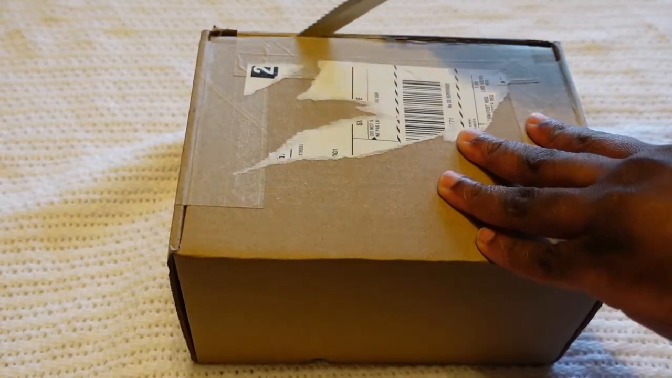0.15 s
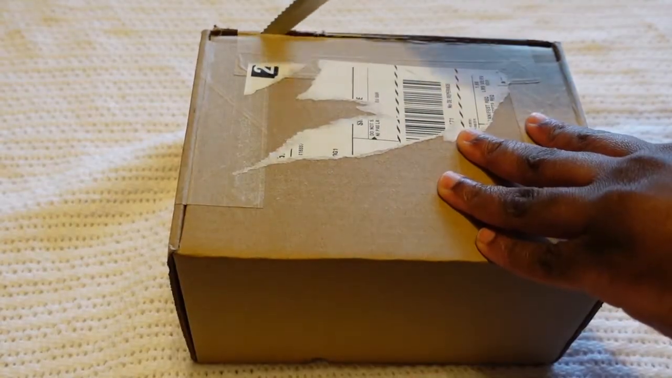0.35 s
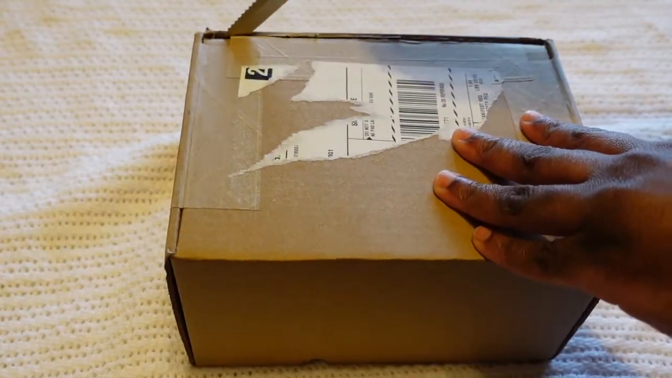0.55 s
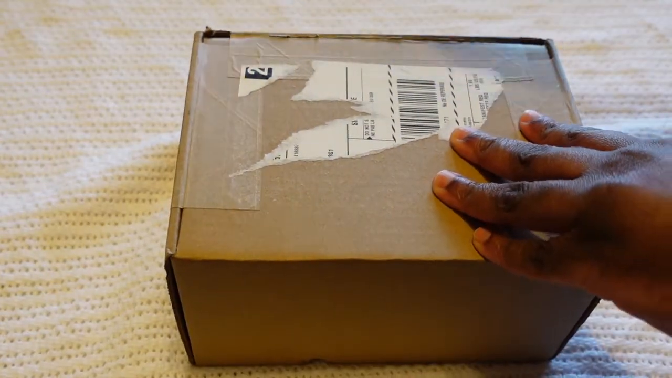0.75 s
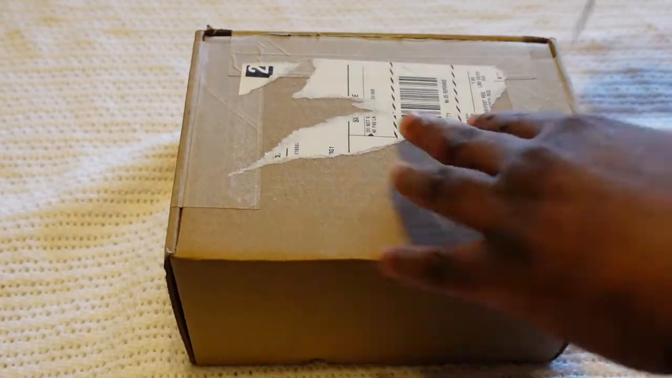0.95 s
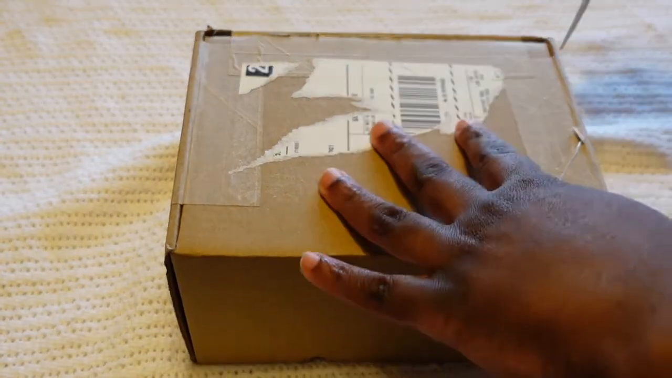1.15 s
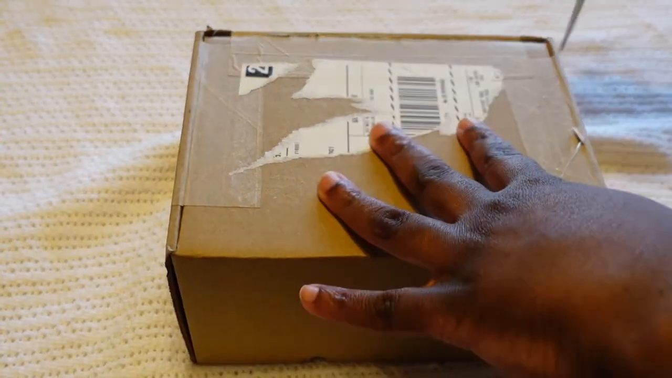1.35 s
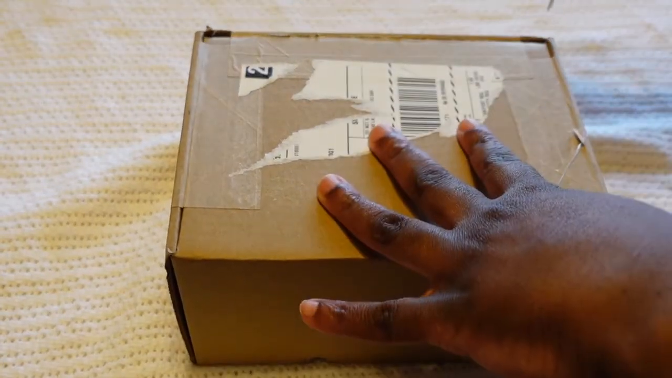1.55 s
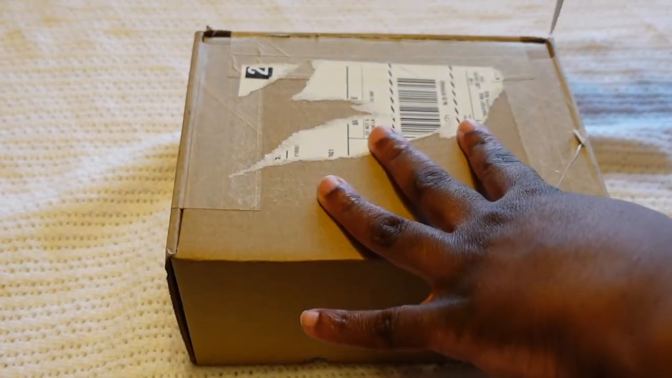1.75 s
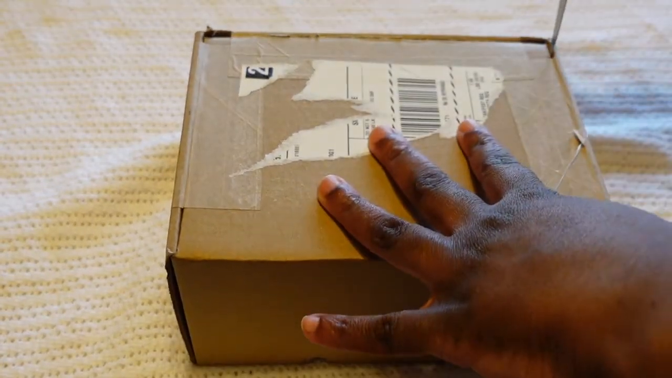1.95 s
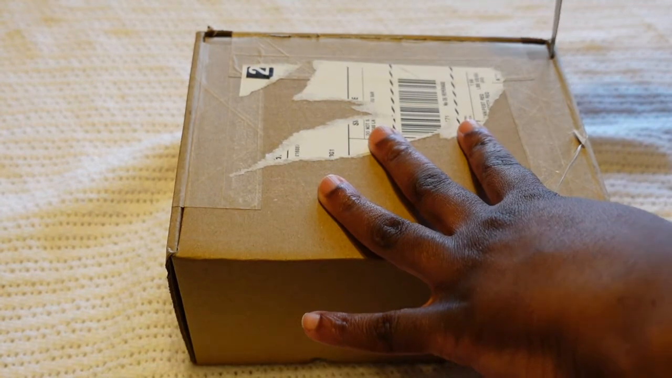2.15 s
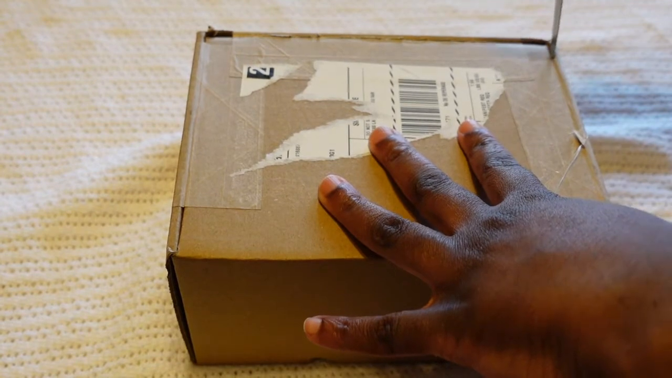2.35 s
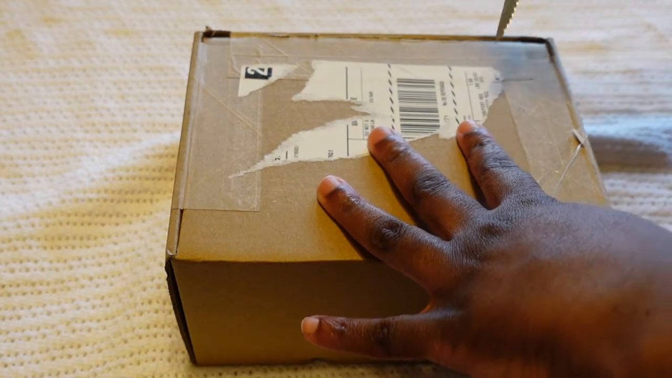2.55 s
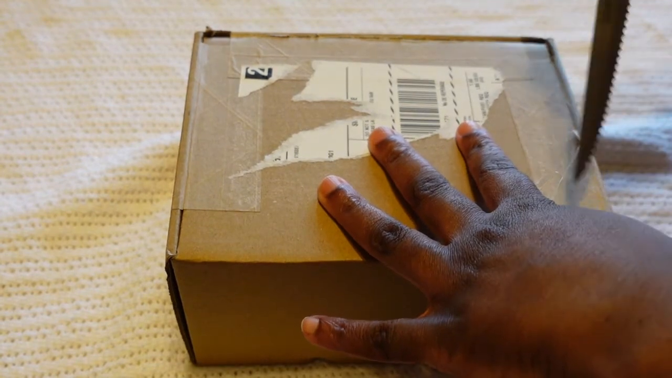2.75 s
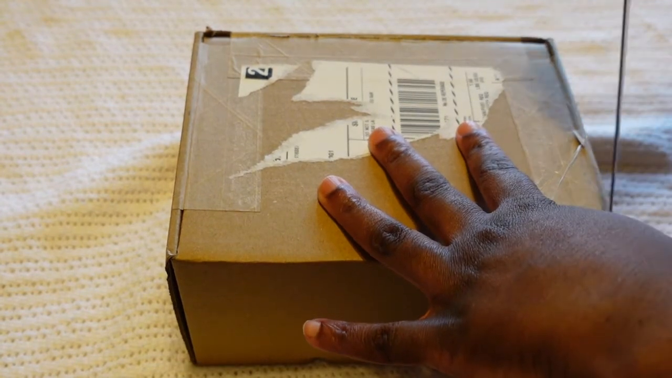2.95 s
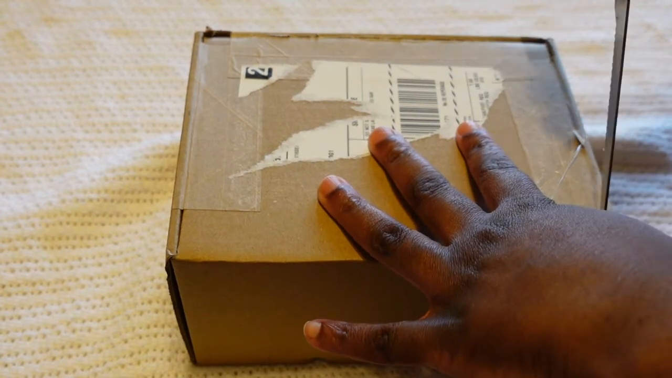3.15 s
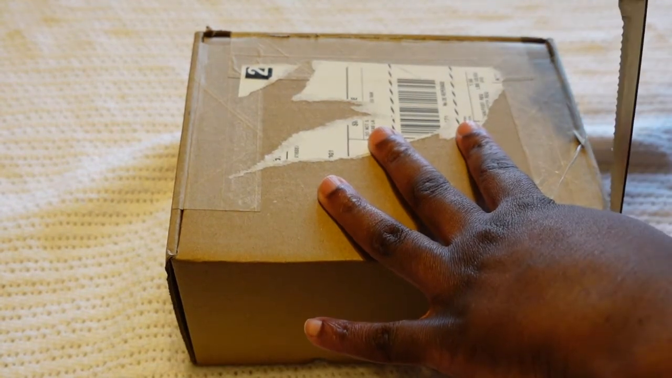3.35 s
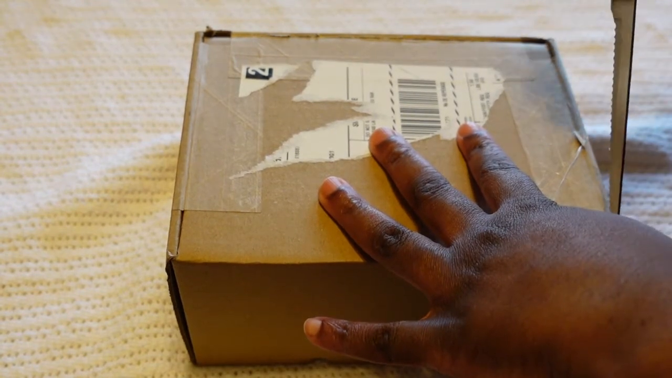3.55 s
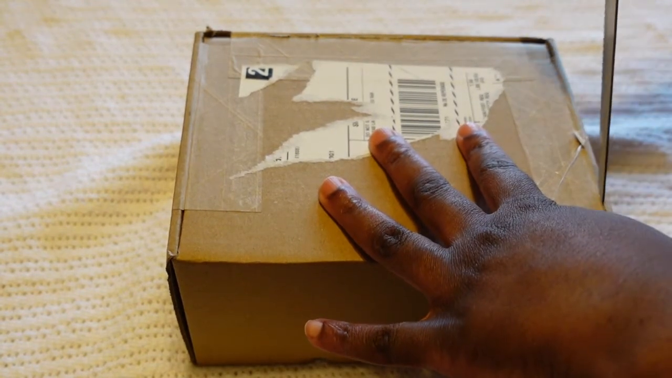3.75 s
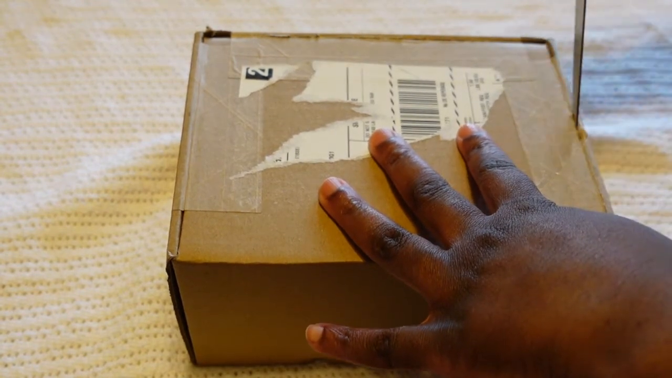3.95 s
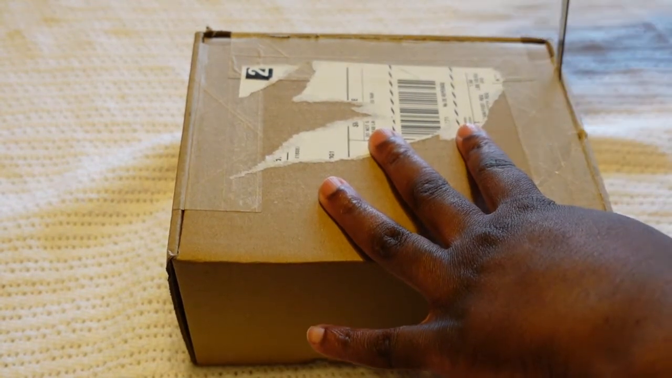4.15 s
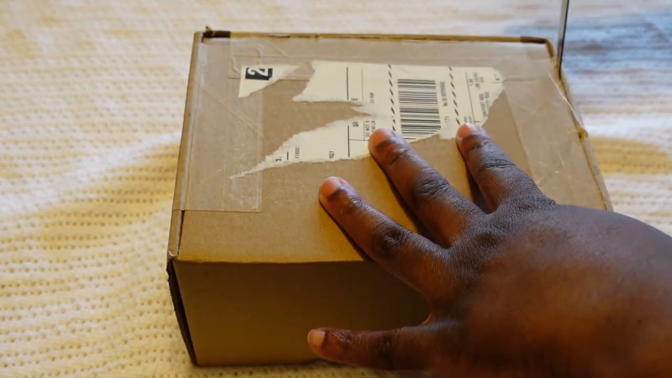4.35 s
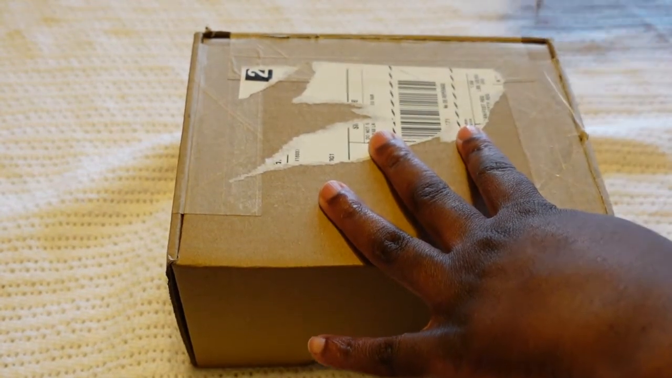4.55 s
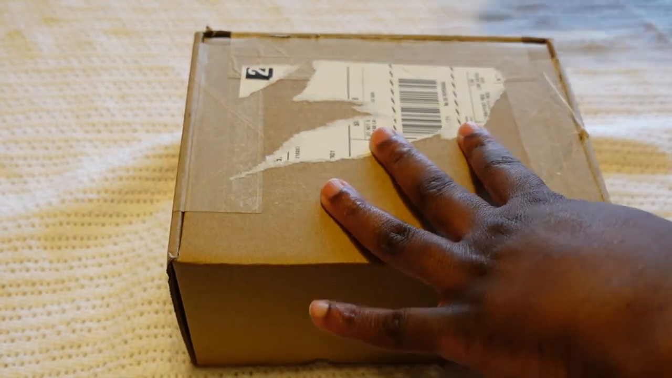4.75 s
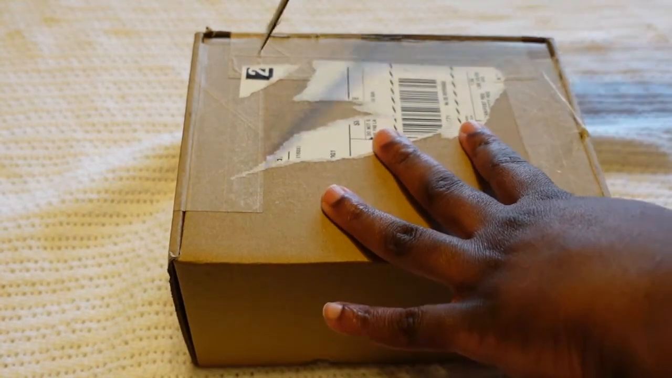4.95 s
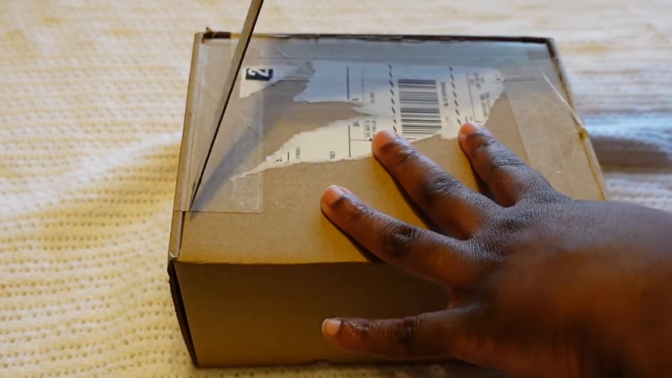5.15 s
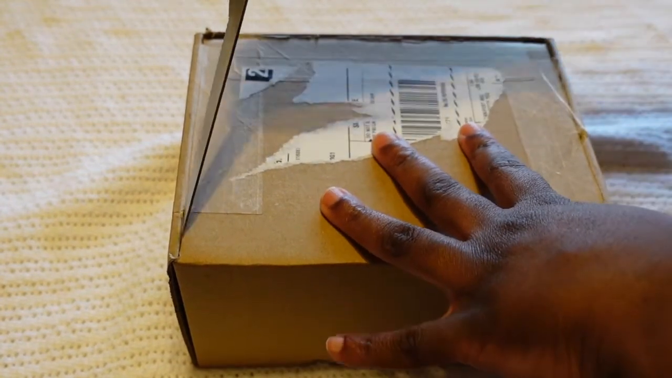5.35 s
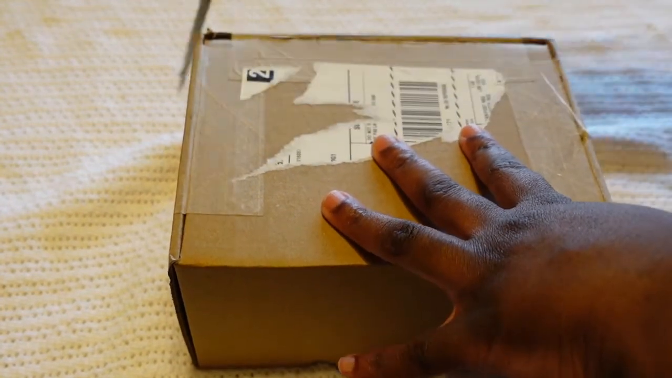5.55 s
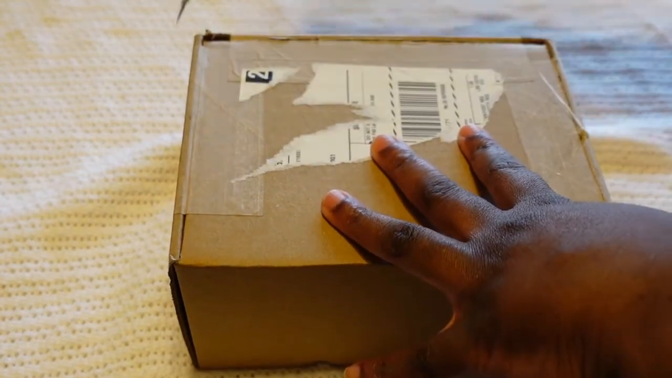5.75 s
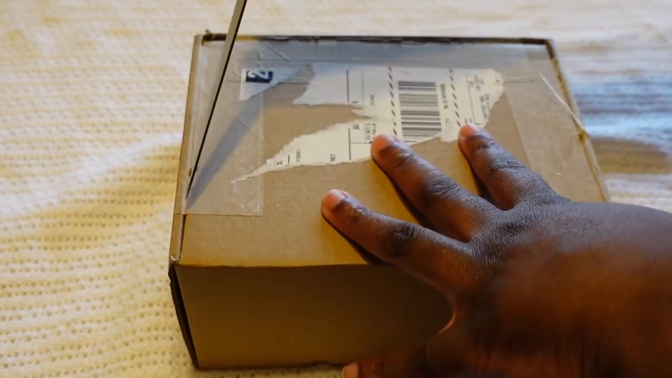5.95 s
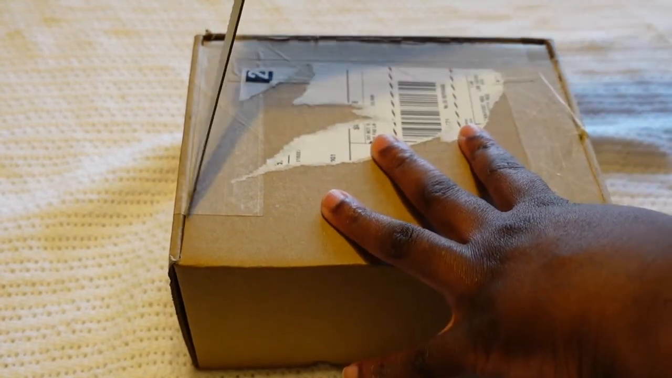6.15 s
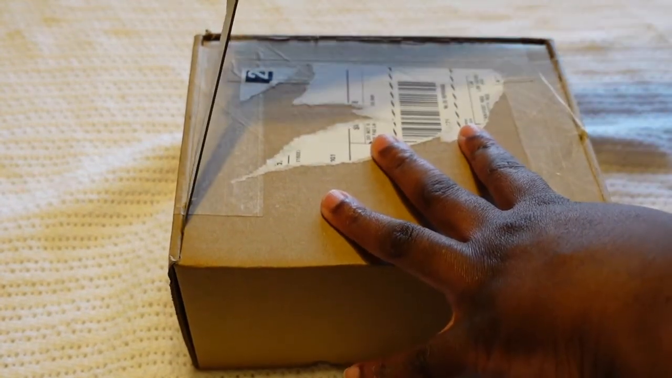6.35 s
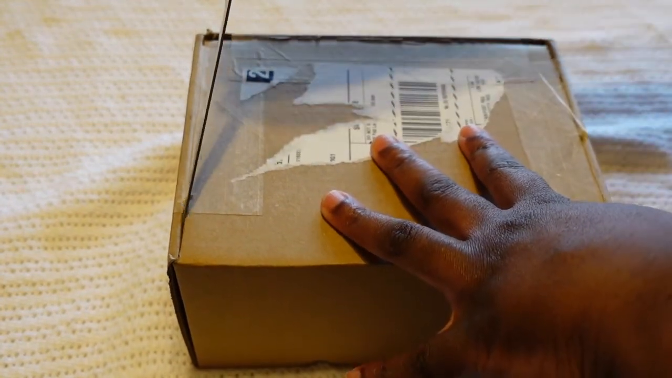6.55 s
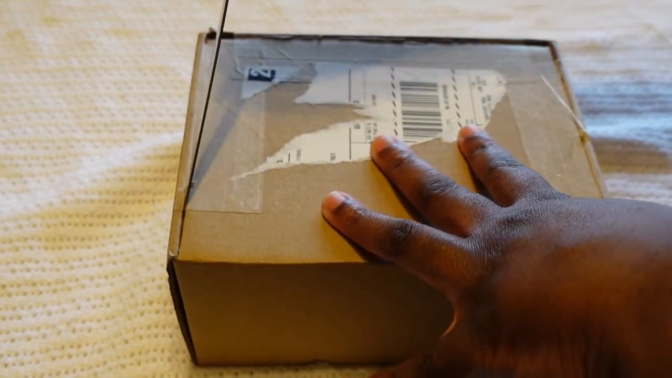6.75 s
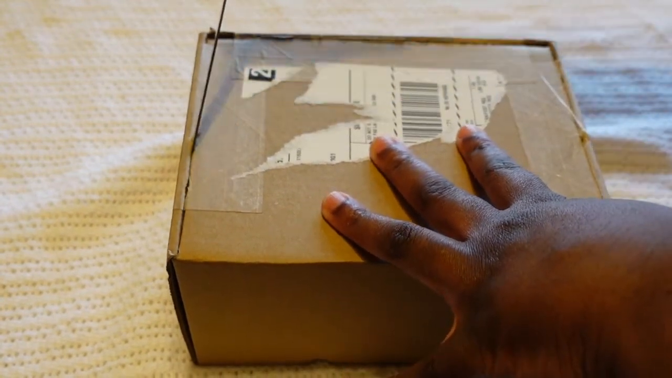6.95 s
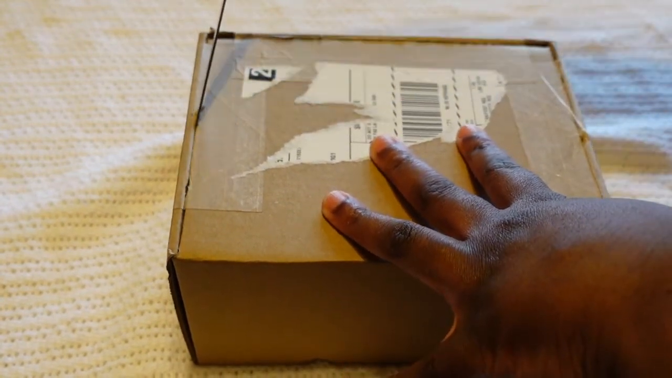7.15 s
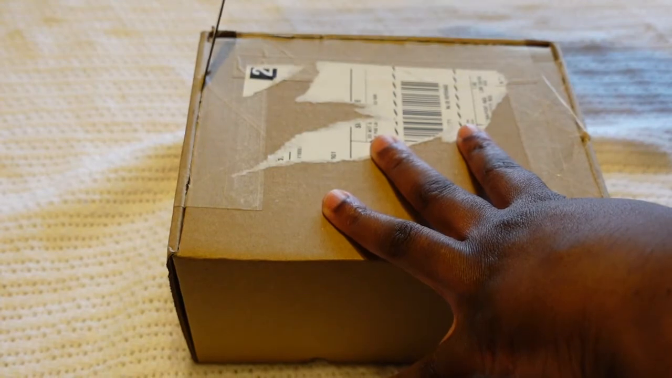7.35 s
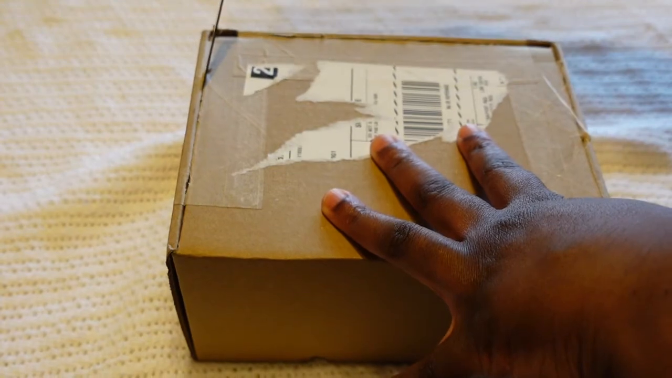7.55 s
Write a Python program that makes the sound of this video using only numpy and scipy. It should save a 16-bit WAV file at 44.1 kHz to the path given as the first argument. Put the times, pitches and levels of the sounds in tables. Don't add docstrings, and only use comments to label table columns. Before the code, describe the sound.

Close up in a quiet, dry room, a toothed knife drags and rips loudly through tape on a hollow cardboard box. Small scrapes and a hand shifting on the lid follow, then gritty pulls with thumps, a sharp double-edged jab, a pause, another hard stab, light knocks and two softer rasping strokes. Faint low room hum sits behind.

```python
import sys
import numpy as np
from scipy import signal
from scipy.fft import rfft, irfft
from scipy.io import wavfile

SR = 44100
rng = np.random.default_rng(int(sys.argv[2]) if len(sys.argv) > 2 else 0)


def makeup_ratio(level_db):
    decades = np.asarray(level_db, float) / 20
    return 10 ** decades


def pcm_store(signal):
    levels = np.round(np.clip(np.atleast_2d(signal), -1, 1) * 32767)
    wavfile.write(sys.argv[1], SR, levels.astype(np.int16).T)


N = 335601
BOOM_HZ, EDGE_HZ = 650, 4750
SHIFT_S = 0.07

# time in seconds, level in dB.
HAND = [(0.0, -49.5), (.55, -42.5), (.8, -54), (1.1, -60), (1.35, -57.5), (1.7, -74), (2.2, -64),
        (2.55, -57.5), (2.75, -70.5), (3.2, -54), (3.55, -56), (4.6, -54), (5.1, -60.5), (5.75, -51),
        (6.15, -59), (6.7, -52), (7.61, -54)]


def rms_one(x):
    return x / np.sqrt(np.mean(x ** 2) + 1e-20)


def at_hz(points, hz):
    table_hz, values = np.array(points).T
    return np.interp(np.log(hz + 1), np.log(table_hz), values)


def drift(rate_hz):
    r = np.exp(-2 * np.pi * rate_hz / SR)
    slow = signal.lfilter([1], [1, -2 * r, r * r], rng.standard_normal(N + SR))
    return rms_one(slow[SR:])


def band_filter(order, hz, kind, x):
    return signal.sosfilt(signal.butter(order, hz, kind, fs=SR, output="sos"), x)


def three_ways(boom, rub, hiss):
    return np.array([band_filter(3, BOOM_HZ, "low", boom),
                     band_filter(3, [BOOM_HZ, EDGE_HZ], "band", rub),
                     band_filter(3, EDGE_HZ, "high", hiss)])


def minimum_phase(power):
    cepstrum = irfft(np.log(power) / 2)
    size = len(cepstrum)
    cepstrum[1:size // 2] *= 2
    cepstrum[size // 2 + 1:] = 0
    return irfft(np.exp(rfft(cepstrum)))


def box_response(panels, top_db, low_db, chance, size=4096):
    # frequency in Hz, density in dB per Hz.
    card = [(60, -33.5), (193, -0.5), (427, -3), (621, -8), (991, -3.5), (6740, -12.5), (11500, -18),
            (16000, -26.5)]
    hz = np.arange(size // 2 + 1) * SR / size
    tops_db = np.mean([peak_db - at_hz(card, centre_hz) for centre_hz, _, peak_db in panels])
    patch = np.clip(chance[:, 2], -1.4, 1.4)
    patch_at_hz = np.interp(np.sqrt(hz / SR * 2), np.linspace(0, 1, len(chance)), patch)
    patches_db = 4.7 / (1 + hz / 9000) * patch_at_hz
    valley_db = 4.0
    power = makeup_ratio(at_hz(card, hz) + tops_db - valley_db + patches_db) ** 2
    for (centre_hz, width_hz, peak_db), (slide, swell, _) in zip(panels, chance):
        half_width_hz = 0.52 * max(width_hz, 0.047 * centre_hz)
        off = (hz - centre_hz * (1 + 0.041 * slide)) / half_width_hz
        power = power + makeup_ratio(peak_db + 0.87 * swell) ** 2 / (1 + off ** 2) ** 1.2
    top_shade = top_db * np.clip(np.log2((hz + 1) / 8000), 0, 1) * 2
    low_shade = low_db * np.clip(np.log2(330 / (hz + 1)) * 2, 0, 1)
    return minimum_phase(power * makeup_ratio(top_shade + low_shade) ** 2)


def box_rings():
    # frequency in Hz, width in Hz, peak in dB.
    far_panels = [
        [(531, 110, 3), (1090, 14, -3.5), (1500, 300, -3.5), (2680, 170, -3), (3260, 150, -16), (4560, 250, -6),
         (6030, 27, -7)],
        [(407, 14, -2), (560, 100, -5), (980, 10, -11.5), (1200, 15, -7.5), (2763, 13, -11), (5570, 16, -13.5),
         (6700, 95, -15), (8900, 31, -17.5)],
        [(337, 140, -4.5), (3070, 140, -7), (4720, 68, -5), (5900, 60, -16), (7300, 120, -12), (10250, 71, -17)],
    ]
    right_panels = [
        [(1720, 270, 2.5), (3040, 150, -2), (4320, 570, -2.5), (6030, 64, -30), (7580, 120, -10)],
        [(940, 48, 4), (1900, 100, -2), (4400, 200, 0), (7500, 76, -6)],
        [(301, 45, 28), (2040, 85, 5), (4900, 64, -2), (5860, 42, -47), (7100, 55, -4.5), (8460, 270, -0.5)],
        [(320, 68, -3.5), (980, 67, -16), (1560, 140, -4), (4080, 180, -12.5), (6790, 94, -20), (7600, 78, -17),
         (8600, 32, -26), (9950, 43, -18)],
        [(336, 140, -8), (950, 130, -8), (1603, 60, -1), (2170, 37, -6), (3650, 1200, -12), (4880, 180, -8.5),
         (7060, 75, -28), (8250, 130, -16)],
        [(277.3, 100, 3.5), (790, 38, -5), (1010, 99, -1.5), (1570, 190, -2), (2070, 260, -9.5),
         (3600, 520, -14), (5050, 84, -6.5)],
        [(324, 160, 0), (1000, 180, -13.5), (1440, 85, -15.5), (2840, 77, -37), (3920, 1000, -21.5)],
        [(216, 42, -1), (1910, 130, -28), (2340, 67, -24), (2970, 200, -20), (4760, 68, -23)],
        [(1360, 600, 14), (3200, 120, 8), (4500, 110, -2), (5670, 44, -41), (6630, 56, -24.5)],
    ]
    left_panels = [
        [(329, 60, 3), (6840, 110, -34.5), (7000, 600, -22)],
        [(435, 130, 8), (950, 500, 3.5), (2340, 300, 3), (4700, 31, -7), (7070, 300, -6)],
        [(298, 140, 9), (920, 54, -2), (3050, 130, -15), (4710, 88, -33), (7000, 110, -18)],
        [(280, 103, 8), (1200, 56, -8), (5300, 57, -34), (7100, 55, -24), (9300, 110, -36), (11000, 54, -37)],
        [(280, 150, 1.5), (1440, 49, -7), (1660, 90, -8), (2270, 99, -11), (3540, 35, -24), (4100, 140, -16.5),
         (6830, 700, -11), (9200, 900, -13)],
        [(288, 116, -3), (974, 53, -18), (1490, 40, -8), (2100, 340, -12.5), (3430, 55, -33), (3950, 110, -15),
         (6130, 670, -7.5), (8400, 1100, -5)],
    ]
    place_from_s = [.24, .59, 1.5, 2.24, 2.8, 3.58, 3.81, 4.0, 4.35, 4.72, 4.9, 5.15, 5.35, 6.0, 6.5, 6.8,
                    7.13]
    bass_db = [-8.5, 4, -2.5, -5, -4.5, 5.3, 1, 6, 0.5, .1, -6, -2, -8, -4, -2, 1, -2.2, 1.2]
    treble_db = [-0.5, 2, 1.5, 0.5, 1.5, -1, -2, 2.5, 0, 1, -2, -8, -11, -3, -4, 1, 2, 10.5]
    panels = far_panels + right_panels + left_panels
    step_s = np.arange(0, N / SR, SHIFT_S)
    place = np.searchsorted(place_from_s, step_s + SHIFT_S / 2)
    by_step = rng.standard_normal((len(step_s), 60, 3))
    by_place = rng.standard_normal((len(treble_db), 60, 3))
    chance = 0.8 * by_step + 0.6 * by_place[place]
    return np.array([box_response(panels[k], treble_db[k], bass_db[k], c) for k, c in zip(place, chance)])


def through_box(boom, rub, hiss, rings, measure):
    parts = three_ways(boom, rub, hiss)
    scales = measure(three_ways(rings, rings, rings))
    out = np.zeros(N + SR)
    step = round(SHIFT_S * SR)
    for k, ring in enumerate(rings):
        force = (parts[:, k * step:(k + 1) * step] / scales[:, k, None]).sum(axis=0)
        rung = signal.fftconvolve(force, ring)
        out[k * step:k * step + len(rung)] += rung
    return out[:N]


def strokes():
    # time in seconds, rubbing level in dB, blade depth in dB.
    far_cuts = [
        [(0.0, -28.5, 0), (.085, -28, 0.5), (.182, -32.5, 1.5), (.207, -43, 2), (.23, -49, -6), (.252, -35, 4)],
        [(.254, -43, 13), (.262, -22, 4.3), (.283, -24, 4), (.3, -23, 11), (.312, -25.5, 10), (.328, -23, 9),
         (.36, -35, 6.5), (.41, -30, -3), (.43, -30.5, -2.5), (.445, -38, -1.5)],
        [(.445, -32.5, -4), (.456, -28.5, -2), (.468, -25, -3.5), (.485, -32, 6), (.505, -32.5, -1),
         (.56, -58, 15), (.61, -62, -11)],
        [(.62, -54, -4), (.64, -50, -9), (.678, -31.5, 0), (.702, -42.5, -11.5), (.715, -47.5, 16.5),
         (.77, -80, 3)],
    ]
    right_cuts = [
        [(3.604, -32, 7), (3.612, -38, 6.5), (3.64, -38.5, 3), (3.7, -43, 3), (3.73, -35.5, 0.5),
         (3.76, -38, 3), (3.79, -46.5, -1), (3.815, -37, 9)],
        [(3.815, -41, 2.5), (3.85, -32, 0.5), (3.9, -32.5, -1.5), (3.93, -31, 1), (3.945, -32.5, 6.5),
         (3.962, -30, 0.5), (3.988, -30, -0.5), (4.0, -40, 12)],
        [(4.0, -34, -4), (4.02, -28, 2.5), (4.06, -32, 2.5), (4.13, -31, 4.5), (4.165, -35, 3),
         (4.205, -54.5, 12.5), (4.3, -69, 13)],
        [(4.36, -55, 3), (4.434, -53, 2), (4.465, -36, 2.5), (4.479, -24, 2), (4.495, -29, 4), (4.515, -29, 2),
         (4.545, -27, 5.5), (4.578, -39, 7), (4.68, -67, 19.5)],
        [(1.86, -70, 8), (1.875, -59, 11), (1.935, -58.5, 6), (1.96, -76, 5)],
        [(4.925, -66, -7), (4.938, -52, 3), (4.958, -62, -4), (4.975, -48, -0.5), (5.028, -50, 0),
         (5.045, -63, -4)],
    ]
    left_cuts = [
        [(5.41, -62, 8), (5.468, -40, 0), (5.48, -45, -1), (5.488, -35, 1), (5.497, -46, 2), (5.523, -37, 9),
         (5.54, -42.5, -11)],
        [(5.54, -44, 1), (5.547, -23, -6), (5.552, -28, 6), (5.558, -21.5, 4.5), (5.572, -23, 5.5),
         (5.588, -33, 2), (5.599, -30, 2), (5.64, -43, 7.5), (5.82, -69.5, 16.5)],
        [(6.826, -58, -1), (6.835, -44, -3), (6.87, -43.5, 4.5), (6.9, -37, 1), (6.94, -32.5, 2),
         (6.974, -29, 1), (7.02, -32, 2.5), (7.075, -34.5, 2.5), (7.095, -46, 17), (7.13, -69, 20)],
        [(7.135, -60, 6), (7.147, -45, -1), (7.19, -42.5, 3), (7.21, -33, 1), (7.235, -38.5, 4),
         (7.27, -36.5, 9), (7.3, -35.5, 7), (7.352, -30, 2.5), (7.395, -58.5, 21), (7.45, -69.5, 24)],
        [(6.53, -61, 7), (6.565, -49, 7), (6.585, -51, 10), (6.61, -48.5, 10), (6.65, -44, 4), (6.69, -61, 15)],
    ]
    # peak in seconds, rise in seconds, fall in seconds, rubbing level in dB, blade depth in dB.
    scrapes = [(.85, 0.15, 0.074, -50.5, -1.5), (0.929, 0.053, 0.054, -41.5, 0),
               (1.139, 0.24, 0.05, -53.5, 4), (1.385, .015, .025, -58, 0.5), (2.025, 0.033, .02, -59, -1),
               (2.075, 0.06, 0.073, -51, 1.5), (2.175, .012, .02, -59.5, -1.5),
               (2.348, 0.044, 0.032, -37, 2.5), (2.461, .03, .025, -39, 1), (2.487, .014, .014, -37, 0),
               (2.615, 0.03, 0.05, -61.5, -8), (3.104, 0.0087, 0.071, -55.5, 3.5),
               (3.169, 0.011, 0.033, -53.5, -6), (3.24, 0.0094, .03, -44, -5),
               (3.255, .03, 0.03, -43, -2.5), (3.322, .015, 0.023, -48, 0), (3.36, 0.11, 0.15, -55.5, 3.5),
               (4.385, 0.49, 0.063, -59, 0), (4.831, 0.15, 0.11, -53.5, 4),
               (5.243, 0.014, 0.061, -44.5, -1), (6.07, 0.02, 0.052, -57, 14.5),
               (6.058, .015, .02, -61, -8), (2.745, .04, .04, -67, -8), (6.193, 0.0098, 0.016, -49, -4),
               (6.25, 0.026, 0.044, -50, 13), (6.282, 0.03, 0.02, -46, -2), (6.303, 0.012, 0.019, -46, -2),
               (3.8, 0.009, 0.014, -28.5, -0.5), (2.95, 0.19, 0.11, -77, 29), (6.318, 0.03, 0.054, -47, 15),
               (6.75, 0.081, 0.25, -56, 0.5), (7.53, 0.054, 0.26, -59.5, 5)]
    t = np.arange(0, N + 32, 32) / SR
    hand_db = np.interp(t, *np.transpose(HAND))
    power = makeup_ratio(hand_db + np.array([[0], [-13], [-29]])) ** 2
    moves = []
    for s, db, depth in map(np.transpose, far_cuts + right_cuts + left_cuts):
        moves.append((np.interp(t, s, db, -200, -200), np.interp(t, s, depth)))
    fade_db, curve = 18, 0.86
    for peak_s, rise_s, fall_s, db, depth in scrapes:
        away = np.maximum((peak_s - t) / rise_s, (t - peak_s) / fall_s)
        moves.append((db - fade_db * np.minimum(away, 4) ** curve, depth))
    for db, depth in moves:
        boom_db = db - 0.83 + 0.91 * depth
        hiss_db = db - 4 - 1.1 * depth
        power += makeup_ratio([boom_db, db + 0 * t, hiss_db]) ** 2
    return np.array([np.interp(np.arange(N) / SR, t, gain) for gain in np.sqrt(power)])


def grit(per_s, spread_db, smooth):
    sizes = makeup_ratio(spread_db * np.minimum(rng.exponential(1, N), 4)) * rng.choice([-1, 1], N)
    clicks = rms_one(sizes * (rng.random(N) < per_s / SR))
    return rms_one(clicks + smooth * rng.standard_normal(N))


def sawing(rings):
    boom, rub, hiss = strokes() * makeup_ratio(0.66 * drift(53))
    coarse = grit(per_s=700, spread_db=2.0, smooth=0.39)
    fine = grit(per_s=3500, spread_db=3.0, smooth=0.72)
    boom = boom * makeup_ratio(0.41 * drift(22)) * coarse
    rub = rub * makeup_ratio(1.7 * drift(120) + 1.3 * drift(25)) * fine
    hiss = hiss * makeup_ratio(1.4 * drift(90)) * fine
    return through_box(boom, rub, hiss, rings, lambda parts: np.sqrt(np.sum(parts ** 2, axis=-1)))


def box_floor():
    # frequency in Hz, width in Hz, level in dB re the hand's boom.
    floor_notes = [(126.8, 12, -2), (205.4, 25, -1), (310, 44, -7)]
    hand_db = np.interp(np.arange(N) / SR, *np.transpose(HAND))
    murmur = np.zeros(N)
    for hz, width_hz, db in floor_notes:
        resonator = signal.iirpeak(hz, hz / width_hz, SR)
        note = rms_one(signal.lfilter(*resonator, rng.standard_normal(N)))
        murmur += makeup_ratio(db + 3.0 * drift(11)) * note
    return makeup_ratio(hand_db) * murmur


def snaps(rings):
    # time in seconds, peak in dB, dullness in dB, ring in Hz.
    far_snaps = [(.2175, -21, -12, 1430), (.2565, -8, -2, 565), (.2638, -7, -7.5, 2680),
                 (.2697, -7, -2, 560), (.2745, -7.5, 2.5, 580), (.286, -5, -3, 1490), (.2903, -6, -10, 583),
                 (.293, -16.5, 4.5, 1030), (.2985, -6, -8, 630), (.3013, -16.5, 0, 2760),
                 (.3046, -7.5, -4, 900), (.3075, -3, 4, 610), (.318, -22, 6.5, 1200),
                 (.3233, -6.5, -6.5, 1570), (.326, -3, 1, 1320), (.469, -13, 1.5, 2600),
                 (.4785, -11, 3, 4200), (.551, -30.5, -12.5, 1270), (.815, -35.5, 17, 810),
                 (1.149, -31.5, 8, 1256), (.085, -27, -3, 1500), (.962, -39, -7, 1500),
                 (1.289, -45, 6, 3200)]
    right_snaps = [(2.461, -30, -3, 2100), (2.476, -24, 5, 925), (2.484, -27, -1.5, 980),
                   (3.103, -37, 10, 619), (3.256, -29, 2.5, 694), (3.366, -34, -1, 630),
                   (3.406, -31, 2.5, 940), (3.607, -10.5, 8.5, 1090), (3.8, -17.5, 2, 950),
                   (3.93, -20, -5, 1000), (3.96, -24, 1, 1500), (4.011, -4.5, 9, 1070),
                   (4.287, -38, 4, 3600), (4.478, -12, 4, 1440), (4.523, -13, -6, 1010),
                   (4.527, -5.5, -2, 587), (4.5459, -8, -4.5, 2930), (4.761, -39, 0, 1500),
                   (4.974, -33, 3, 1400)]
    left_snaps = [(5.234, -41, -6, 1140), (5.263, -24, 11.5, 870), (5.487, -19.5, -6.5, 974),
                  (5.5448, -18, -6, 926), (5.5487, -4.5, 1, 610), (5.5548, -3, -2, 700),
                  (5.559, -4.5, 3, 2400), (5.746, -37, 22, 620), (5.778, -45, 2, 3200),
                  (6.235, -28, -3, 1150), (6.309, -17, 2, 920), (6.443, -43, 5, 1500),
                  (6.56, -41, -5, 1500), (6.593, -45, -7, 1200), (6.61, -43, -8, 1200),
                  (6.633, -42, -7, 1700), (6.651, -38, -7, 1200), (6.709, -36, 0, 1520),
                  (6.751, -31.5, 19, 895), (7.537, -43, 0, 6000), (7.546, -43, 0, 6100)]
    length = 2048
    boom, rub, hiss, spot = np.zeros((4, N + length))
    ms = np.arange(length) * 1000 / SR
    for s, peak_db, dull_db, ring_hz in far_snaps + right_snaps + left_snaps:
        start = round(s * SR)
        here = slice(start, start + length)
        tear = rng.standard_normal(length)
        burst = 0.2 * tear * np.exp(-ms / 1.22)
        burst[0] = np.sign(tear[0])
        boom[start] += burst[0] * makeup_ratio(peak_db - 16 + dull_db)
        rub[here] += burst * makeup_ratio(peak_db - 4.5)
        hiss[here] += burst * makeup_ratio(peak_db - 4.5 - dull_db)
        ring_db = peak_db - 11.5 + 0.28 * dull_db
        spot[here] += makeup_ratio(ring_db) * np.sin(2 * np.pi * ring_hz * ms / 1000) * np.exp(-ms / 3.2)
    rung = through_box(boom[:N], rub[:N], hiss[:N], rings, lambda parts: np.max(np.abs(parts), axis=-1))
    return spot[:N] + rung


def knocks():
    # time in seconds, peak in dB, frequency in Hz, T60 in seconds.
    blows = [(.455, -21, 430, 0.098), (.463, -9.5, 410, 0.081), (4.488, -19, 420, 0.048),
             (4.834, -36, 320, 0.037), (2.476, -32.5, 950, 0.072), (4.012, -21, 266, 0.061),
             (4.528, -10.5, 295, 0.065), (5.265, -28, 310, 0.035), (3.607, -23, 760, .03),
             (5.5, -30, 270, 0.084), (5.521, -24, 412, .05), (5.545, -17, 7000, .025),
             (5.597, -24, 1800, .03), (5.556, -8.5, 900, 0.089), (5.564, -11, 1200, 0.056),
             (5.558, -16, 457, 0.18), (6.236, -29, 320, 0.099), (6.307, -18, 927, 0.025),
             (6.317, -34, 930, .15), (6.31, -20.5, 394, .05), (6.312, -24, 185, 0.052),
             (6.752, -26.5, 395, 0.034), (6.836, -22, 290, 0.088), (2.473, -35, 4600, 0.05),
             (2.485, -38, 4700, .06), (6.309, -32, 2300, .03), (1, -37, 440, 0.036), (4.49, -22, 860, 0.05),
             (4.507, -21, 1020, .05), (4.547, -17, 406, .06), (.33, -17, 1280, .08), (4.01, -24, 8050, .02),
             (3.606, -22, 3400, .02), (5.262, -33, 720, .03)]
    twin = 1.045
    out = np.zeros(N + SR)
    t = np.arange(SR // 4) / SR
    for s, peak_db, hz, t60_s in blows:
        envelope = makeup_ratio(peak_db - 60 * t / t60_s) * (1 - np.exp(-t / 0.0017))
        modes = 0.7 * np.sin(2 * np.pi * hz * t) + 0.35 * np.sin(2 * np.pi * hz * twin * t)
        start = round(s * SR)
        out[start:start + len(t)] += envelope * modes
    return out[:N]


def near_surfaces(x):
    taps = rng.standard_normal(2048) * np.exp(-np.arange(2048) / 450)
    coloured = band_filter(1, [500, 9000], "band", x)
    return signal.fftconvolve(coloured, taps / np.linalg.norm(taps))[:N]


def room(x):
    # frequency in Hz, T60 in seconds.
    decay = [(100, 0.25), (700, 0.06), (2000, 0.57), (6000, 0.1), (15000, 0.42)]
    t = np.arange(SR // 2) / SR
    edges_hz = 60 * 2. ** np.arange(9)
    tail = np.zeros((2, len(t)))
    for low, high in zip(edges_hz, edges_hz[1:]):
        band = band_filter(2, [low, high], "band", rng.standard_normal(tail.shape))
        tail += band * makeup_ratio(-60 * t / at_hz(decay, np.sqrt(low * high)))
    difference = signal.lfilter([1, -1], [1, -0.95], tail[1])
    tail = tail[0] + 0.5 * difference * [[1], [-1]]
    tail *= np.clip((t - 0.004) / 0.017, 0, 1)
    return signal.fftconvolve(x[None], rms_one(tail) / np.sqrt(len(t)), axes=1)[:, :N]


def air():
    # frequency in Hz, density in dB per Hz.
    air_colour = [(15, -79), (25, -35), (92, -24), (105, -14.5), (206, -2.5), (394, -19.5), (624, -15),
                  (734, -21), (1160, -20.5), (3520, -33.5), (10700, -41), (16000, -46)]
    # frequency in Hz, likeness from 0 to 1.
    likeness = [(60, 0.88), (240, 0.73), (950, 0.13), (3770, 0.14), (15000, 0.24)]
    hz = np.arange(N // 2 + 1) * SR / N
    alike = np.clip(at_hz(likeness, hz), 0, 1)
    mid, side = rfft(rng.standard_normal((2, N))) * makeup_ratio(at_hz(air_colour, hz))
    both = irfft(np.sqrt(1 + alike) * mid + np.sqrt(1 - alike) * side * [[1], [-1]], N)
    return makeup_ratio(-53.5 + 0.55 * drift(12)) * rms_one(both)


def scene():
    rings = box_rings()
    knife = band_filter(3, 100, "high", sawing(rings) + box_floor() + snaps(rings) + knocks())
    pan_db, width_db, room_db = 0.12, -16, -18.5
    direct = knife * makeup_ratio([[-pan_db], [pan_db]])
    direct = direct + makeup_ratio(width_db) * near_surfaces(knife) * [[1], [-1]]
    return direct + makeup_ratio(room_db) * room(knife) + air()


def band_limit(x):
    return signal.sosfilt(signal.butter(12, 16990, fs=SR, output="sos"), x)


def record(dry):
    rounded = 1.3 * np.tanh(dry / 1.3)
    top_cut = signal.ellip(12, 0.5, 70, 15800, fs=SR, output="sos")
    mix = signal.sosfilt(top_cut, rounded)
    return band_limit(mix)


dry = scene()
out = record(dry)
pcm_store(out)
```